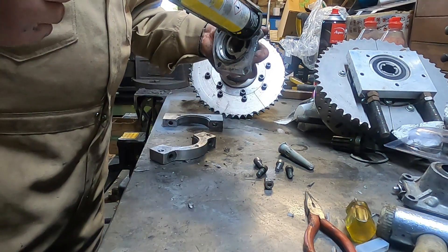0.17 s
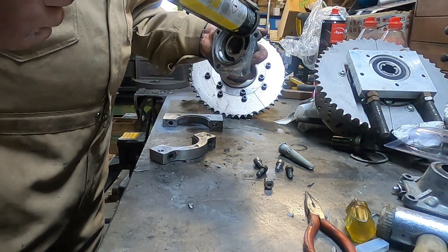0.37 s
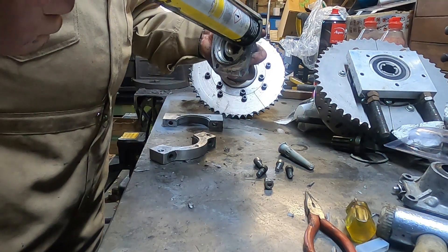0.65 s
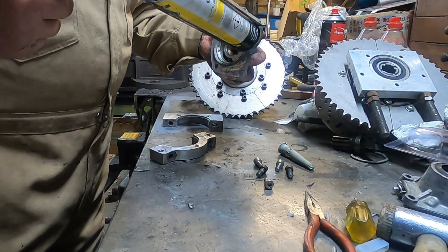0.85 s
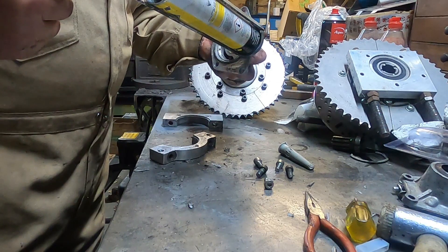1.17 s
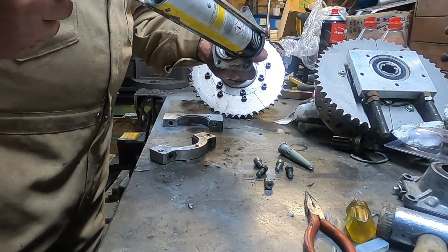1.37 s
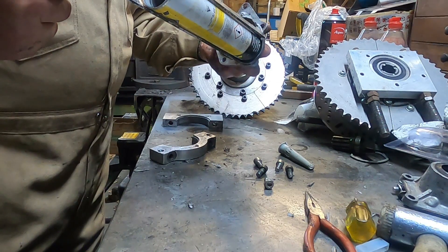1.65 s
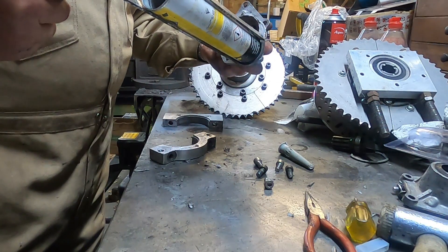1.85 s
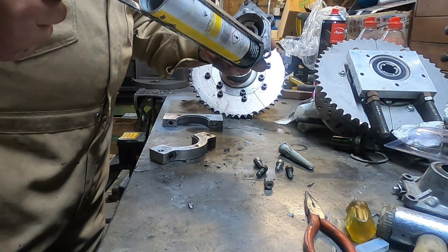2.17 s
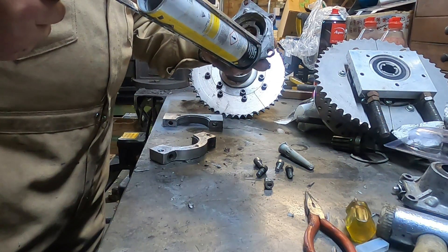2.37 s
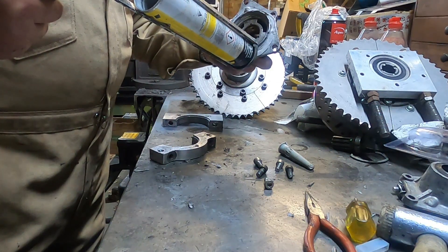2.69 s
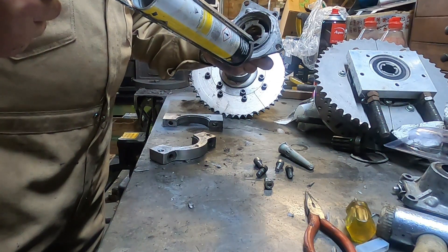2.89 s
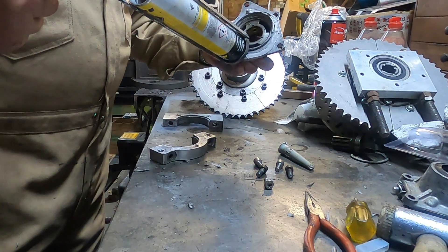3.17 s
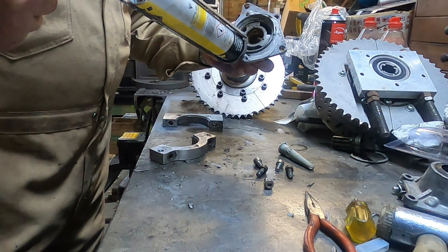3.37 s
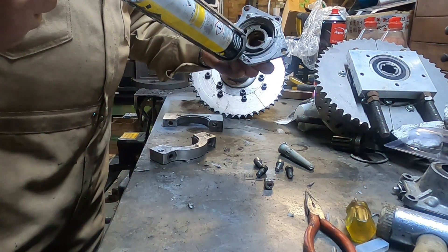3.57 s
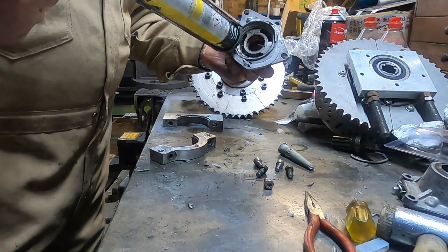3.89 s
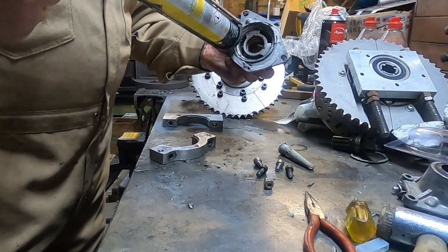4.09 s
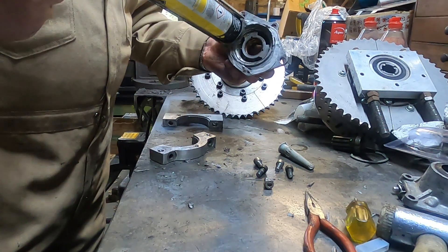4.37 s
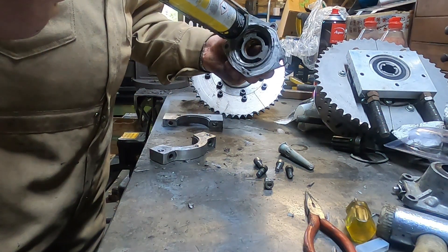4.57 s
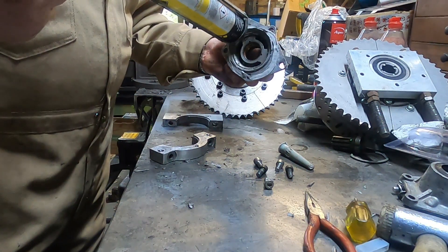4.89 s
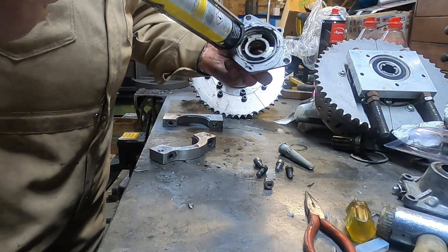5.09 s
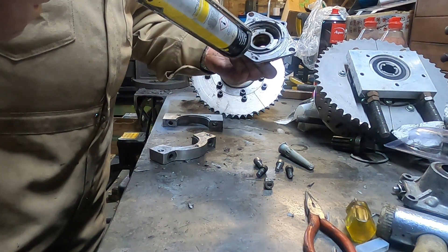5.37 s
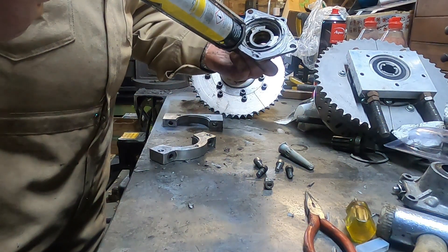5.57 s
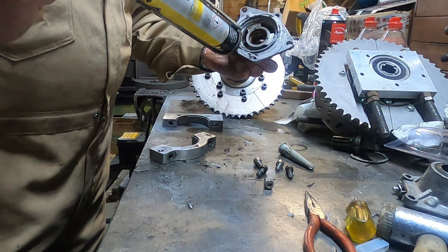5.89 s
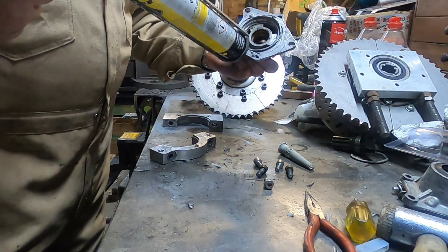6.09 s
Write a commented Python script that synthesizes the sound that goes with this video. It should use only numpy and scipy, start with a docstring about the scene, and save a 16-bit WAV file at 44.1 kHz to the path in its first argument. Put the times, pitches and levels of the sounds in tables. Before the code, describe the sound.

A hand caulking gun is worked close to the microphone in a small, quiet workshop. From 0 to 0.4 s its rod chatters through the grip plate in a dense, uneven run of thin metal ticks, hardest near 0.36 and ending in a duller stop at 0.39. Dull tube knocks come at 0.57 and 0.76. Crisp, bright trigger clicks follow: faint at 0.6 and 1.0, firmer at 1.4, a close pair at 2.0, one at 3.1, a quick four from 3.3 to 3.5, another cluster at 3.8-4.1, then singles at 4.4 and 4.65. Small gritty scrapes slip in near 2.95 and 3.9. Each click has a short room tail. Faint, rough falling bird chirps recur throughout, distant and echoey, over uneven low rumble, soft drone and slight hiss. From 5 s only soft bumps and birds remain, until a springy scrape and growing sleeve rustle from 6.0 to 6.2.

```python
"""Caulking gun at the bench

A hand caulking gun: its rod chatters through the grip plate, the tube knocks, then the trigger clicks singly and in runs.
Each blow is a burst of noise ringing plate, tube, frame and spring; short scrapes are tiny random slips.
The workshop answers with a short noise tail. Small birds, swept sines heard only as echoes, chirp faintly
over a low rumble, faint hiss, drone and sleeve rustle, all of filtered noise.
"""
import sys
import numpy as np
from scipy import signal
from scipy.fft import rfft, irfft, next_fast_len
from scipy.io import wavfile
from scipy.ndimage import map_coordinates

SR = 44100
rng = np.random.default_rng(int(sys.argv[2]) if len(sys.argv) > 2 else 0)


def master_out(mix):
    """Clip the mix to full scale and print it as 16-bit PCM to the path in sys.argv[1]."""
    frames = np.transpose(np.atleast_2d(mix))
    ceiling = np.clip(frames, -1, 1)
    pcm = np.round(ceiling * 32767).astype(np.int16)
    wavfile.write(sys.argv[1], SR, pcm)


N = 275184


def trigger_clicks():
    """The trigger snaps the grip plate: softer contacts have a lower edge, a tighter grip rings higher."""
    # clicks: start_s, level_db, length_s (before each part's share), edge_hz, plate_pitch_ratio
    clicks = [(0.6015, -39, 0.0027, 10100, 1.04), (1.022, -37.5, 0.0025, 14000, 1),
              (1.3878, -34.5, 0.0023, 9100, 0.93), (1.9831, -32, 0.0031, 11500, 1.04),
              (2.0347, -29.5, 0.003, 13500, 1.034), (3.0962, -33.5, 0.0024, 12000, 1.01),
              (3.284, -31.5, 0.0024, 12600, 1.02), (3.3147, -30.5, 0.0036, 12800, 0.99),
              (3.4126, -29, 0.002, 14300, 1.01), (3.4927, -29, 0.003, 14900, 0.99),
              (3.9669, -32, .004, 12100, 1.02), (4.0306, -31.5, .0037, 15500, 1.02),
              (4.107, -34.5, 0.0045, 15000, 1.016), (4.3894, -29.5, 0.0034, 12200, 1.006),
              (4.6589, -30, 0.0029, 12900, 1)]
    # share of each part: plate_db, tube_db, frame_db, coil_db, crack_db
    click_mix = (0, -21.5, -8, -14, -6.5)
    out = np.zeros((2, N))
    for start_s, level_db, length_s, edge_hz, pitch in clicks:
        direct, radiated = blow(level_db, length_s, edge_hz, click_mix, pitch)
        add(out, start_s, near(direct, radiated, wet_db=-6.0))
    return out


def rod_slips():
    """The rod jumps through the plate and jolts the frame; harder slips have shorter contacts."""
    # jumps of the rod: start_s, level_db
    slips = [(0.0337, -40), (0.05, -44.5), (0.0924, -39.5), (0.159, -36.5), (0.179, -38), (0.192, -38),
             (0.2067, -41.5), (0.2198, -40), (0.232, -39.5), (0.2393, -38.5), (0.255, -34.5), (0.2785, -37),
             (0.284, -37.5), (0.294, -38.5), (0.3073, -40.5), (0.3232, -43), (0.3556, -30), (0.3856, -39.5),
             (3.8274, -38.5), (5.1597, -59)]
    # share of each part: plate_db, tube_db, frame_db, coil_db, crack_db
    slip_mix = (-2, -16, -12, 1.5, -2)
    usual_s, usual_db, halving_db = 0.0048, -41, 20  # every 20 dB above usual halves the contact
    out = np.zeros((2, N))
    for start_s, level_db in slips:
        length_s = usual_s * .5 ** (max(level_db - usual_db, 0) / halving_db)
        direct, radiated = blow(level_db, length_s, 11460, slip_mix)
        add(out, start_s, near(direct, radiated, wet_db=-5.5))
    # the plunger meets the tube: a duller, drier blow
    stop_s, stop_db, stop_length_s, stop_edge_hz = 0.3856, -30, 0.0039, 8300
    direct, radiated = blow(stop_db, stop_length_s, stop_edge_hz, slip_mix)
    add(out, stop_s, near(direct, radiated, wet_db=-10))
    return out


def tube_knocks():
    """The tube knocks in its cradle, a dull blow that favours the tube's own ring."""
    # knocks: start_s, level_db
    knocks = [(0.2667, -44.5), (0.571, -48.5), (0.7585, -39.5)]
    # share of each part: plate_db, tube_db, frame_db, coil_db, crack_db
    knock_mix = (2.5, 5, 0, 3, -14)
    out = np.zeros((2, N))
    for start_s, level_db in knocks:
        direct, radiated = blow(level_db, 0.0029, 8500, knock_mix)
        add(out, start_s, near(direct, radiated, wet_db=-5.5))
    return out


def blow(level_db, length_s, edge_hz, mix, pitch=1):
    """One contact rings plate, tube, frame and spring coil, with a crack on top; each has its own chatter length."""
    # resonances of the grip plate: centre_hz (before the pitch ratio), width_hz, level_db
    plate_modes = [(4246, 220, 2), (4604, 125, 3), (4950, 244, -3.5), (5450, 610, -13.5)]
    # resonances of the tube: centre_hz, width_hz, level_db
    tube_modes = [(423, 260, -9), (907, 103, -1.5), (1394, 400, -3.5)]
    # resonances of the frame: centre_hz, width_hz, level_db
    frame_modes = [(1743, 78, -11.5), (2214, 430, -10), (2690, 510, -1), (3000, 197, 1.5), (3147, 110, -2),
                   (3960, 120, -8.5)]
    # resonances of the spring coil: centre_hz, width_hz, level_db
    coil_modes = [(1727, 154, 1), (1980, 180, -3), (3120, 370, -0.9), (3810, 114, 1)]
    # resonances of the top crack: centre_hz, width_hz, level_db
    crack_modes = [(5880, 670, 0.5), (7020, 414, 2.5), (7290, 940, -1.5), (9030, 1300, -5),
                   (9840, 670, -4.5), (12270, 750, -6.5), (13700, 1400, -13.5)]
    plate = [(hz * pitch, width, db) for hz, width, db in plate_modes]
    parts = [
        strike(plate, length_s * 1.18),
        strike(tube_modes, length_s * 0.76),
        strike(frame_modes, length_s * 0.65),
        strike(coil_modes, length_s * 0.85),
        strike(crack_modes, length_s * 0.96),
    ]
    hit = sum(amp(level_db + part_db) * part for part_db, part in zip(mix, parts))
    softness = signal.butter(5, min(edge_hz, SR * .45), fs=SR, output="sos")
    direct, radiated = signal.sosfilt(softness, hit)
    return direct, radiated


def strike(modes, length_s, first=4, rise_s=0.00017):
    """A part rung by metal chatter, and its plain ring; each has the energy of rms 1 held for 5 ms."""
    t = np.arange(SR // 20) / SR
    envelope = np.exp(-(t / length_s) ** 6) * (1 - np.exp(-t / rise_s))
    chatter = rng.standard_normal(len(t)) * envelope
    tap = t == 0
    # no two contacts land alike
    modes = [(hz, width, db + rng.normal(0, 1)) for hz, width, db in modes]
    rung = ring(np.array([chatter + first * tap, tap]), modes)
    # keep each part in its own band
    band = np.clip([modes[0][0], modes[-1][0] * 1.47], 50, SR * .49)
    rung = signal.sosfilt(signal.butter(3, band, "bandpass", fs=SR, output="sos"), rung)
    return np.array([unit(row) for row in rung]) / np.sqrt(10)


def rod_scrapes(dull_hz=9500, jerk_db=3):
    """The sliding rod catches in tiny uneven slips that ring the spring and make the plate squeal."""
    # slides of the rod: start_s, length_s, spring_db, squeal_db (relative to the spring)
    scrapes = [(0, 0.021, -56.5, 10), (1.256, 0.032, -63.5, 0), (1.62, 0.011, -64, -5.5),
               (2.653, 0.02, -65.5, -3), (2.776, 0.016, -63, -3.5), (2.948, 0.13, -54.5, 2.5),
               (3.861, 0.019, -61, -14), (3.919, 0.15, -58, -5), (4.261, 0.035, -63, 0),
               (4.464, 0.051, -59, -1.5), (5.037, 0.1, -68, -5), (6.022, 0.055, -48, -6),
               (6.06, 0.073, -56, -7)]
    # resonances of the rubbed spring: centre_hz, width_hz, level_db
    spring_modes = [(1635, 170, 7.5), (2920, 600, -10.5)]
    # resonances of the squealing plate: centre_hz, width_hz, level_db
    squeal_modes = [(4620, 250, 5), (9350, 730, -16.5)]
    out = np.zeros((2, N))
    for start_s, length_s, spring_db, squeal_db in scrapes:
        u = np.arange(round(length_s * SR)) / (length_s * SR)  # 0 to 1 through the slide
        jerk = map_coordinates(rng.standard_normal(40), [u * length_s * 100], mode="mirror")
        force = np.sin(np.pi * u) ** 0.44 * amp(jerk_db * jerk)
        # about 1500 catches a second
        catches = rng.standard_normal(len(u)) * (rng.random(len(u)) < 1500 / SR)
        grit = unit(ring(catches, spring_modes)) + amp(squeal_db) * unit(ring(catches, squeal_modes))
        scrape = amp(spring_db) * filtered(grit * force, lambda hz: 1 / (1 + (hz / dull_hz) ** 6))
        add(out, start_s, near(scrape, scrape, wet_db=-3.5))
    return out


def handling():
    """Soft low bumps as the work is handled, each a brief swell of one deep resonance."""
    # bumps: start_s, level_db
    bumps = [(2.929, -63.5), (5.09, -62.5), (5.73, -62.5), (6.041, -61), (6.15, -57)]
    out = np.zeros((2, N))
    swell = np.hanning(round(0.18 * SR))
    body = [(65.8, 21, 0)]  # centre_hz, width_hz, level_db
    for start_s, level_db in bumps:
        deep = ring(ring(diffuse(SR // 2), body), body)[:, -len(swell):]
        add(out, start_s, amp(level_db) * unit(deep * swell))
    return out


def near(direct, radiated, wet_db):
    """Direct sound reaches two ports with a small phase gap; what radiates all round feeds the room."""
    # phase gap between the ports: frequency_hz, left_lag_rad
    port_lag = [(300, 0.65), (2000, 0.39), (4500, 0.98), (7000, 1), (12000, 0.6)]
    # balance between the ports: frequency_hz, left_minus_right_db
    balance = [(500, -1.5), (2000, 1.5), (4500, 2.5), (8000, -2), (12000, -2.5)]
    pair = amp(wet_db) * room(radiated)
    sides = np.array([[.5], [-.5]])
    add(pair, 0, filtered(direct, lambda hz: np.exp(-1j * along(port_lag, hz) * sides)))
    return filtered(pair, lambda hz: amp(along(balance, hz) * sides))


def room(x, early_db=4, early_s=0.013, echo_db=3, echo_s=0.011):
    """The workshop's answer: strong early echoes, a cluster off the nearest wall, then an even decay."""
    # decay of the workshop: frequency_hz, t60_s
    decay = [(200, 0.27), (1500, .33), (4500, 0.32), (8000, 0.28), (14000, 0.16)]
    hz, t, z = signal.stft(diffuse(SR // 2), SR, nperseg=256)
    fading = z * amp(-60 * t / along(decay, hz)[:, None])
    tail = signal.istft(fading, SR, nperseg=256)[1]
    t = np.arange(tail.shape[1]) / SR
    early = early_db * np.exp(-t / early_s)
    cluster = echo_db * np.exp(-((t - echo_s) / 0.0016) ** 2)
    onset = np.clip(t / .002 - 1, 0, 1)  # silent for 2 ms, full at 4 ms
    tail = tail * amp(early + cluster) * onset
    return signal.fftconvolve(x[None], unit(tail) / np.sqrt(len(t)), axes=1)


def birds(flutter_hz=170, warble_hz=520, waver_hz=480, throat_hz=4150, throat_width_hz=1500, flicker_db=3.0):
    """Rough falling chirps that swell and fade, far away and heard only through their echoes."""
    # chirps: start_s, length_s, level_db (before a 2 dB cut)
    chirps = [(0.584, 0.16, -55), (0.813, 0.18, -63.5), (1.159, 0.17, -52), (1.368, 0.12, -56),
              (1.79, 0.11, -69), (1.92, 0.1, -60), (2.034, 0.12, -56.5), (2.301, 0.16, -61.5),
              (2.772, 0.19, -53), (3.618, 0.15, -55), (4.12, 0.15, -66), (4.454, 0.18, -55.5),
              (5.025, 0.16, -54.5), (5.335, 0.23, -57), (5.717, 0.16, -56.5), (6.01, 0.12, -55)]
    full_db, full_start_hz, end_hz, start_hz_per_db = -53, 5217, 3243, 66  # weaker chirps start lower
    out = np.zeros((2, N))
    for start_s, length_s, level_db in chirps:
        start_hz = full_start_hz + start_hz_per_db * (level_db - full_db)
        u = np.arange(round(length_s * SR)) / (length_s * SR)  # 0 to 1 through the chirp
        warble = np.sin(2 * np.pi * flutter_hz * length_s * u)
        waver, effort = [
            map_coordinates(rng.standard_normal(80), [u * length_s * 220], mode="mirror") for _ in range(2)
        ]
        pitch_hz = start_hz + (end_hz - start_hz) * u + warble_hz * warble + waver_hz * waver
        tone = np.sin(2 * np.pi * np.cumsum(pitch_hz) / SR)
        call = unit(tone * np.sqrt(np.sin(np.pi * u)) * amp(flicker_db * effort))
        call = filtered(call, lambda hz: 1 / (1 + ((hz - throat_hz) / throat_width_hz) ** 4))
        add(out, start_s, amp(level_db - 2.0) * room(call, early_db=0, early_s=0.032, echo_db=2))
    return out


def sleeve_rustle():
    """A dull rustle of sleeve: noise through one low resonance with its treble rolled off."""
    # level of the rustle: time_s, level_db
    sleeve_level = [(5.6, -72.5), (6.1, -61), (6.24, -57.5)]
    cloth = ring(diffuse(N), [(253, 123, 0)])
    cloth = unit(filtered(cloth, lambda hz: 1 / (1 + (hz / 3000) ** 2)))
    return amp(curve(sleeve_level)) * cloth


def room_drone():
    """Noise gathered in one narrow resonance of the room, then shaped by a broad one."""
    # level of the drone: time_s, level_db
    drone_level = [(0, -80), (1.2, -76.5), (1.9, -60), (2.5, -65), (3.1, -68.5), (3.7, -63.5), (4.5, -75.5),
                   (5.3, -63.5), (6.24, -71)]
    drone = unit(ring(ring(diffuse(N), [(186, 17, 0)]), [(163, 280, 0)]))
    return amp(curve(drone_level)) * drone


def low_rumble(swell_db=4):
    """Deep noise whose level swells unevenly."""
    # level of the rumble: time_s, level_db
    rumble_level = [(0, -77), (0.8, -73), (1.7, -62.5), (2.9, -62.5), (3.5, -75), (4.3, -62.5), (5.5, -61),
                    (6.24, -64)]
    deep = filtered(diffuse(N), lambda hz: 1 / (1 + (hz / 52) ** 4))
    return amp(curve(rumble_level)) * unit(deep * amp(swell_db * wobble(7.7)))


def room_air():
    """Steady noise, strongest in the lows with a faint hiss on top."""
    # relative spectrum of the air: frequency_hz, level_db (per Hz)
    air_shape = [(25, -4.5), (70, -2), (110, -9.5), (155, -1.5), (300, -12), (650, -20.5), (1050, -15.5),
                 (2200, -22.5), (3500, -22.5), (6000, -28), (12500, -46), (16000, -66)]
    return amp(-62.5) * unit(filtered(diffuse(N), lambda hz: amp(along(air_shape, hz))))


def diffuse(size):
    """Stereo noise as it arrives from all sides, its left-right likeness set by frequency."""
    # likeness of the two sides: frequency_hz, correlation (-1 to 1)
    likeness = [(50, -0.33), (160, 0.23), (400, 0.21), (1000, 0.39), (4000, 0.28), (12000, -0.39)]

    def turn(hz):
        return np.arccos(np.clip(along(likeness, hz), -1, 1)) / 2

    noise = rng.standard_normal((2, size))
    mid, side = filtered(noise, lambda hz: np.array([np.cos(turn(hz)), np.sin(turn(hz))]))
    return np.array([mid + side, mid - side])


def ring(x, modes):
    """x through resonances (centre_hz, width_hz, level_db) summed with alternating sign."""
    def response(f):
        total = 0
        for k, (centre, width, db) in enumerate(modes):
            damping = 1j * f * width
            total = total + (-1) ** k * amp(db) * damping / (centre * centre - f * f + damping)
        return total

    return filtered(x, response)


def filtered(x, response):
    """x times a complex response of frequency."""
    n = x.shape[-1]
    m = next_fast_len(n + 4096)  # padding for the ring-out
    return irfft(rfft(x, m) * response(np.fft.rfftfreq(m, 1 / SR)), m)[..., :n]


def wobble(rate_hz):
    """A smooth random curve, rate_hz knots a second."""
    knots = rng.standard_normal(int(N * rate_hz / SR) + 4)
    return map_coordinates(knots, [np.arange(N) * rate_hz / SR])


def along(points, hz):
    """(frequency_hz, value) points read on a log frequency axis."""
    f, v = np.transpose(points)
    return np.interp(np.log(hz + 1), np.log(f + 1), v)


def curve(rows):
    """(time_s, value) rows to one value per sample."""
    return np.interp(np.arange(N) / SR, *np.transpose(rows))


def add(track, start_s, x):
    """Mix x into the track from start_s, cut off at the track's end."""
    part = track[..., max(round(start_s * SR), 0):][..., :x.shape[-1]]
    part += x[..., :part.shape[-1]]


def amp(db):
    """Decibels to gain."""
    return 10 ** (np.asarray(db) / 20)


def unit(x):
    """Scale to rms 1."""
    return x / np.sqrt(np.mean(x ** 2) + 1e-20)


def scene():
    """Gun, birds and room together."""
    gun = trigger_clicks() + rod_slips() + tube_knocks() + rod_scrapes() + handling()
    background = sleeve_rustle() + room_drone() + low_rumble() + room_air()
    return gun + birds() + background


def record(dry):
    """A very steep low-pass: almost nothing remains above 15.8 kHz."""
    return filtered(dry, lambda hz: 1 / np.sqrt(1 + (hz / 15800) ** 80))


dry = scene()
out = record(dry)
master_out(out)
```